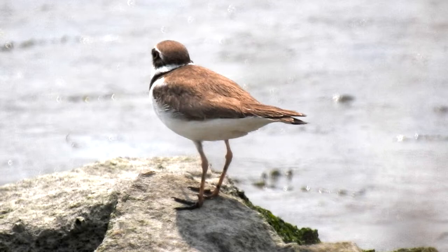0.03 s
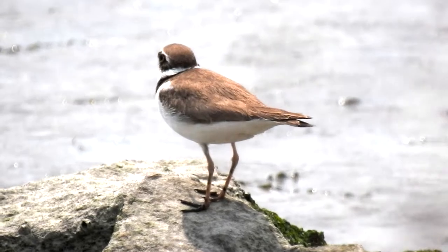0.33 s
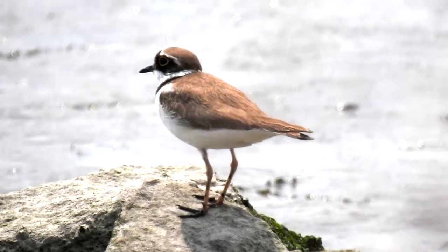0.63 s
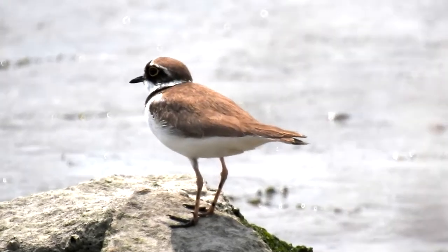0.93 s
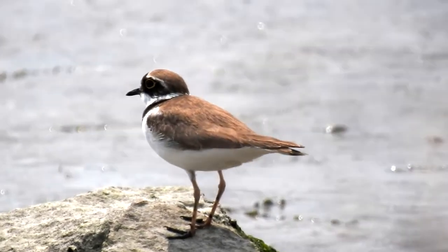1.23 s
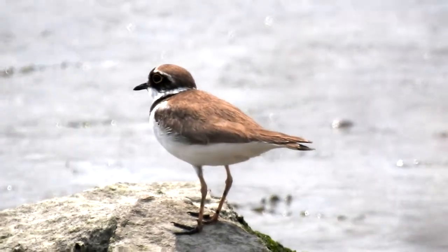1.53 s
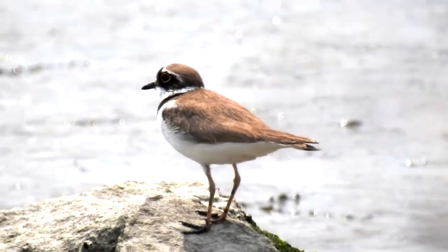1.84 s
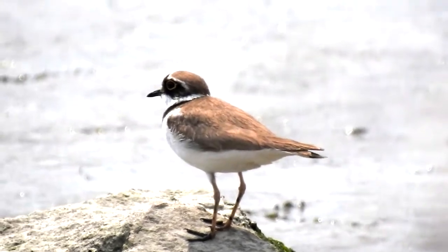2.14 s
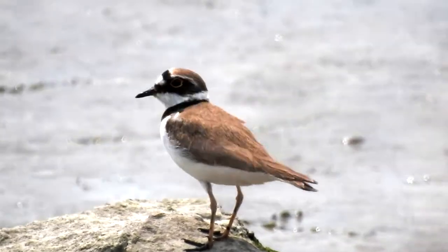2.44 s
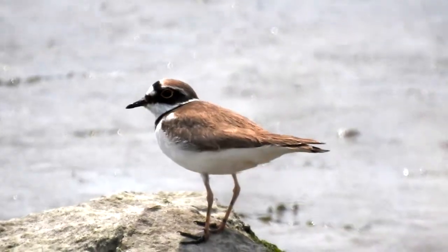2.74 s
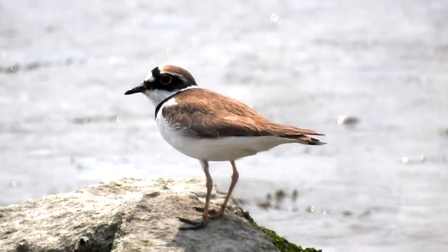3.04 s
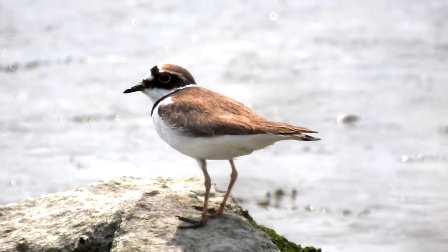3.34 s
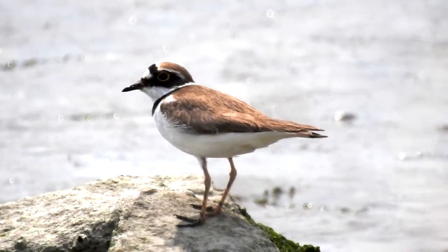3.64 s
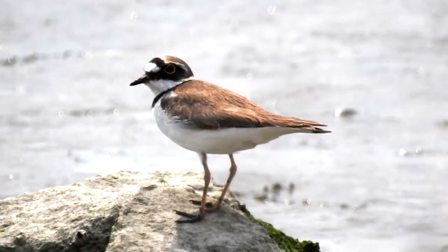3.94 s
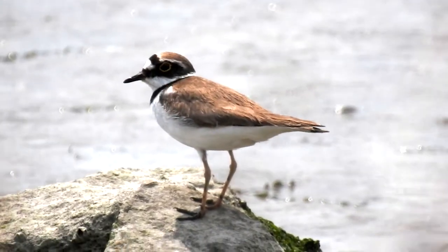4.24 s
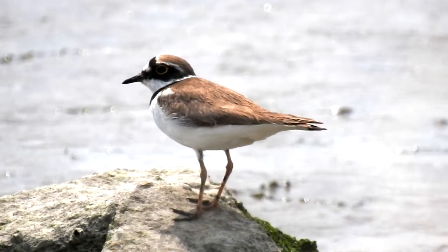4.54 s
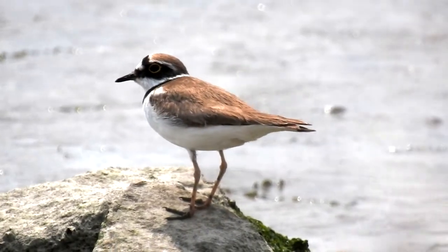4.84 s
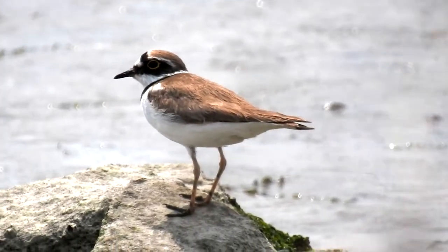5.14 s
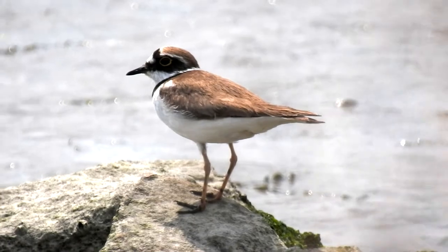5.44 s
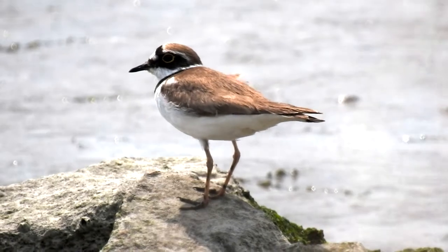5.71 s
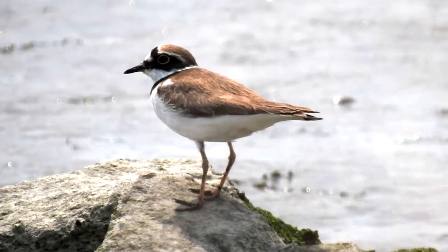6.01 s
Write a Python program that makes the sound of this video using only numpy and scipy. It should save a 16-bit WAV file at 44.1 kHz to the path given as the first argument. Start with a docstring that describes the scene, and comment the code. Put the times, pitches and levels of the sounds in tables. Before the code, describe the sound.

Outdoors on a rocky riverbank, shallow water flows in a steady, bubbling rush that starts abruptly with a sharp pop. It gurgles and laps among the stones, turning a little softer about halfway, just as a small bird whistles a single quick chirp. Underneath are a very faint distant hum, slight puffs of wind and a few soft bumps of a hand on the microphone. A tiny tick comes late.

```python
"""A shallow river rushes past a stony bank: turbulent noise full of small ringing bubbles.
Hollows between the stones resonate, the water surges and gurgles, wavelets lap, spray hisses to the
left, and midway the current eases. The sound opens out of silence with a sharp pop.
Puffs of wind and the soft bumps and brush of a hand touch the microphone; a faint, far hum
comes and goes, a small bird whistles one chirp, and there is one tiny tick."""
import sys
import numpy as np
from scipy import signal
from scipy.fft import rfft, irfft, next_fast_len
from scipy.io import wavfile
from scipy.ndimage import uniform_filter1d, map_coordinates

SR = 44100
rng = np.random.default_rng(int(sys.argv[2]) if len(sys.argv) > 2 else 0)


def persist_wave(psi):
    """Save psi, clipped to +-1, as 16-bit WAV."""
    counts = np.round(np.clip(psi, -1, 1) * 32767).astype(np.int16)
    wavfile.write(sys.argv[1], SR, np.atleast_2d(counts).T)


N = 272097

# Spectra of the rush before and after the current eases, the spray, the river bed, the wind and
# the brushing hand. Each row: frequency in Hz, relative spectral density in dB.
BRISK_SPECTRUM = [(180, -49), (300, -35.5), (373, -25.5), (443, -15), (489, -17), (555, -10), (648, -13.5),
                  (860, -5.5), (1080, -4.5), (1340, -4), (1700, -3.5), (2040, -3), (2240, -5.5), (2420, -6),
                  (2740, -14), (3080, -8.5), (3290, -6), (3780, -13), (4000, -21), (5200, -61.5),
                  (8800, -120)]
EASED_SPECTRUM = [(180, -71.5), (300, -23.5), (489, -14), (560, -10.5), (722, -8.5), (880, -4.5),
                  (1000, -5.5), (1140, -3.5), (1390, -3.5), (1520, -5), (1950, -2.5), (2200, -4),
                  (2460, -6.5), (2720, -11.5), (3100, -7), (3380, -8.5), (3800, -15), (4000, -24),
                  (5200, -63), (8800, -120)]
SPRAY_SPECTRUM = [(2000, -40.5), (3960, -3.5), (4130, 1.5), (4700, 2), (5500, -1.5), (6800, -4.5),
                  (8000, -16), (9100, -25.5), (10000, -37), (13000, -51.5)]
MURMUR_SPECTRUM = [(25, -32.5), (60, -26.5), (110, -5), (170, 3.5), (260, 3), (380, -3.5), (700, -8.5)]
WIND_SPECTRUM = [(40, -29), (110, -5.5), (180, 5), (350, 8), (800, -9), (1600, -23.5)]
BRUSH_SPECTRUM = [(2000, -10), (7000, 0), (13000, -3), (15000, -19)]
# Likeness of left and right in the brisk and eased rush. Each row: frequency in Hz, coherence 0-1.
BRISK_COHERENCE = [(300, 0.96), (700, 0.99), (1000, 0.99), (1500, 0.96), (2700, 0.93), (3300, 0.94),
                   (4000, 1)]
EASED_COHERENCE = [(300, 1), (800, .985), (1200, 0.94), (1600, 0.88), (2700, 0.9), (3300, 0.91),
                   (4000, .83)]
# Cavities between stones. Each row: resonance in Hz, bandwidth in Hz, brisk and eased levels in dB.
HOLLOW_MODES = [(1119, 77, -64.5, -53.5), (1215, 37, -58, -57.5), (1387, 55, -57, -53),
                (1653, 86, -56.5, -56.5), (1930, 270, -60, -57.5)]
# Strength of the spray. Each row: time in seconds, level in dB.
SPRAY_ENVELOPE = [(0.3, -50), (0.46, -52.5), (1.1, -50.5), (1.78, -51), (2.1, -49), (2.7, -52),
                  (3.35, -53.5), (6.1, -55.5)]
# Level difference of the water between channels. Each row: frequency in Hz, left minus right in dB.
WATER_BALANCE = [(300, 0.1), (1000, -0.5), (1600, -.3), (1950, .5), (2900, 0), (3550, 1.3), (3900, 2),
                 (4200, 4.5), (5200, 5.5), (5750, 5.5), (7200, 5.5), (8200, 2), (10000, 0)]
# Phase difference of the water. Each row: frequency in Hz, lag of the left channel in radians.
WATER_PHASE_LAG = [(1400, 0.02), (4800, 0.35), (6300, .8), (7500, 1.6)]
# Brief swells in one band of the water: two broad, bright surges just after the pop, then gurgles.
# Each row: centre in seconds, half-length in seconds, pitch in Hz, bandwidth in Hz, level in dB.
BAND_SWELLS = [(0.205, 0.07, 1870, 450, -40.5), (0.347, 0.054, 1820, 300, -42),
               (0.563, 0.15, 1665, 80, -44), (0.798, 0.099, 1905, 91, -43.5),
               (1.57, 0.091, 1754, 98, -44.5), (1.795, 0.048, 1226, 131, -44),
               (2.58, 0.053, 1300, 199, -46.5), (2.74, .05, 1950, 200, -45.5), (3.32, .04, 1910, 63, -45),
               (3.85, 0.028, 1087, 70.4, -46), (3.963, 0.042, 1934, 54.8, -43.5),
               (4.203, 0.044, 1950, 75, -45), (4.41, 0.038, 1913, 99, -43.5),
               (4.52, 0.04, 1880, 250, -42.5), (4.8, 0.069, 1104, 70, -43), (4.787, 0.032, 1207, 111, -47),
               (5.11, 0.032, 1977, 70, -41.5)]
# Lulls between wavelets. Each row: centre in seconds, half-length in seconds, gain in dB.
LULL_EVENTS = [(0.42, 0.046, -3), (0.672, 0.031, -5.5), (1.093, 0.042, -5.5), (1.668, 0.032, -0.5),
               (3.367, 0.046, -3.5), (3.687, 0.023, -1.5), (4.665, .025, -3.5), (5.033, 0.042, -2),
               (5.23, .03, -1), (5.744, 0.025, -2.5)]
# Puffs of wind. Each row: centre in seconds, level in dB.
WIND_PUFFS = [(.645, -52.5), (1.51, -62), (1.83, -58), (2.575, -55.5), (2.87, -56), (3.15, -59),
              (5.87, -55)]
# Spells of the far hum. Each row: start in seconds, end in seconds, pitch in Hz, gain in dB.
HUM_SPELLS = [(0.699, 1.006, 79, -70), (1.546, 1.6, 79.7, -78), (3.348, 3.9, 89.7, -72),
              (4.197, 5.05, 90.3, -74)]
# Wavelets lapping the stones. Each row: centre in seconds, strength 0-1.
WAVELETS = [(1.23, 0.54), (1.47, 1), (1.79, 0.2), (1.94, 1), (2.1, 0.5), (3.86, 0.4), (4.16, 0.75),
            (4.4, 1), (4.72, .55), (4.84, 0.5), (5.12, 0.55), (5.36, 0.95), (5.5, 0.96), (5.61, 0.74),
            (5.9, 1), (6.03, 1), (6.14, 0.8)]
# Knocks of the hand. Each row: start in seconds, pitch in Hz, envelope peak in dB.
HAND_BUMPS = [(2.546, 180, -51), (2.851, 204, -51), (2.856, 410, -52), (5.756, 175, -50.5),
              (5.862, 210, -56)]

OPEN_S = 0.1166  # the pop ends the silence
EASE_S, EASE_LENGTH_S = 2.8, 0.72  # middle and length of the current's easing


def amp(db):
    """Amplitude ratio of a level in decibels."""
    return 10 ** (np.asarray(db) / 20)


def unit(x):
    """Normalisation to rms 1."""
    return x / np.sqrt(np.mean(x ** 2) + 1e-20)


def clock():
    """Time of each sample in seconds."""
    return np.arange(N) / SR


def along(points, hz):
    """Interpolation of (Hz, value) points on a logarithmic frequency axis."""
    f, v = np.transpose(points)
    return np.interp(np.log(hz + 1), np.log(f + 1), v)


def curve(points):
    """Linear interpolation of (seconds, value) points at every sample."""
    return np.interp(clock(), *np.transpose(points))


def wobble(rate):
    """Smooth random modulation with rate knots a second."""
    return map_coordinates(rng.standard_normal(int(N * rate / SR) + 4), [np.arange(N) * rate / SR])


def swell(s, length):
    """Gaussian envelope about time s; its half-length is one standard deviation."""
    first, last = np.clip([int((s + side * 6 * length) * SR) for side in (-1, 1)], 0, N)
    return np.pad(np.exp(-.5 * ((np.arange(first, last) / SR - s) / length) ** 2), (first, N - last))


def filtered(x, response):
    """Linear filtering: the spectrum of x times a frequency response."""
    m = next_fast_len(N + SR // 2)
    return irfft(rfft(x, m) * response(np.fft.rfftfreq(m, 1 / SR)), m)[..., :N]


def resonance(hz, width_hz):
    """Response of one resonator to random forcing, rms 1."""
    m = next_fast_len(N)
    f = np.arange(m // 8) * SR / m
    real, imag = rng.standard_normal((2, len(f)))
    return unit(irfft((real + 1j * imag) / (1 + ((f - hz) / width_hz * 2) ** 2), m)[:N])


def turbulence(depth_db):
    """Two independent noises, modulated by narrow patches of gain in time and frequency."""
    spectra = signal.stft(rng.standard_normal((2, N)), nperseg=2048)[2]
    patches = uniform_filter1d(rng.standard_normal(spectra.shape[1:]), size=3, axis=0)
    patches = uniform_filter1d(patches, size=6, axis=1)
    gain = amp(depth_db * 2 * np.tanh(unit(patches) / 2))
    return unit(signal.istft(spectra * gain, nperseg=2048)[1][:, :N])


def stereo(pair, spectrum, coherence):
    """Partial coherence: two independent signals are coloured and mixed as mid and side, rms 1."""
    def response(hz):
        angle = np.arccos(np.clip(along(coherence, hz), -1, 1)) / 2
        rolloff = 1 / (1 + (hz / (2 * spectrum[-1][0])) ** 4)
        return rolloff * amp(along(spectrum, hz)) * [np.cos(angle), np.sin(angle)]
    mid, side = filtered(pair, response)
    return unit(np.array([mid + side, mid - side]))


def pop(db, ring_hz, decay_s, thud_db, thud_s):
    """Impulse response of a heavily damped oscillator, with a dull thud under it."""
    t = np.maximum(clock() - OPEN_S, 0)
    crack = amp(db) * np.sin(2 * np.pi * ring_hz * t) * np.exp(-t / decay_s)
    return crack + amp(thud_db) * t / thud_s * np.exp(-t / thud_s)


def opening(excess, settle_s):
    """Exponential relaxation: out of silence the gain overshoots, then settles to 1."""
    t = clock() - OPEN_S
    return np.clip(t * 2000, 0, 1) * (1 + excess * np.exp(-np.abs(t) / settle_s))


def bubbles(centre_hz, spread, cycles, size_db, rise, count):
    """Bubble resonance: each is a damped sine whose pitch rises as it nears the surface."""
    when, size = rng.random((2, count, 1))
    hz = np.clip(centre_hz * np.exp(spread * rng.standard_normal((count, 1))), 500, 8000)
    k = np.arange(int(5 * SR * cycles / centre_hz))
    age = hz * k / SR / cycles  # in decay times, each lasting `cycles` periods
    strength = np.sqrt(hz) * amp(-size_db * np.log(1 - .98 * size))
    phase = 2 * np.pi * cycles * age * (1 + rise * np.minimum(age, 4) / 2)
    ring = strength * np.exp(-age) * np.sin(phase)
    samples = (when * N).astype(int) + k
    return unit(np.bincount(samples.ravel(), ring.ravel(), N)[:N])


def rush(eased, brisk_db=-37, eased_db=-40):
    """Turbulent flow radiates broadband noise and bubble tones, softer and mellower as it eases."""
    swarm = np.array([bubbles(2066, spread=0.456, cycles=8.3, size_db=2.5, rise=0.011, count=5000)
                      for _ in range(2)])
    plinks = np.array([bubbles(1501, spread=0.33, cycles=26, size_db=2.5, rise=0.006, count=200)
                       for _ in range(2)])
    churn = turbulence(depth_db=3.0) + amp(-16.5) * swarm + amp(-21.5 + 3 * eased) * plinks
    bright = stereo(churn, BRISK_SPECTRUM, BRISK_COHERENCE)
    mellow = stereo(churn, EASED_SPECTRUM, EASED_COHERENCE)
    level_db = brisk_db + eased * (eased_db - brisk_db) + 0.4 * wobble(18)
    return amp(level_db) * ((1 - eased) * bright + eased * mellow)


def hollows(eased):
    """Cavity resonance: the flow keeps each hollow between the stones ringing in a narrow band."""
    return sum(amp(brisk_db + eased * (eased_db - brisk_db) + 1.8 * wobble(4.14)) * resonance(hz, width)
               for hz, width, brisk_db, eased_db in HOLLOW_MODES)


def spray():
    """Fine spray sums to a hiss whose channels lose coherence as frequency rises."""
    hiss = stereo(turbulence(depth_db=1.4), SPRAY_SPECTRUM, [(4000, 0.93), (5500, .55), (7000, 0.25)])
    return amp(curve(SPRAY_ENVELOPE)) * hiss


def murmur(eased):
    """Eddies over the river bed radiate low-frequency noise."""
    eddies = stereo(turbulence(depth_db=1.5), MURMUR_SPECTRUM, [(60, .9), (160, 0.78)])
    return amp(-63.0 - 0.5 * eased + 1.5 * wobble(8.5)) * eddies


def river():
    """Superposed water sounds, placed by level and phase: the treble is louder and later on the left."""
    eased = np.clip((clock() - EASE_S) / EASE_LENGTH_S + .5, 0, 1)
    sides = np.array([[.5], [-.5]])  # left, right
    water = lulls(rush(eased) + laps() + hollows(eased))
    for s, length, hz, width_hz, db in BAND_SWELLS:
        water += amp(db) * band_swell(s, length, hz, width_hz)
    water *= amp(0.7 * eased * sides)  # the eased current lies a little to the left
    water = water + spray() + murmur(eased)
    return filtered(water, lambda hz: amp(sides * along(WATER_BALANCE, hz))
                    * np.exp(-1j * sides * along(WATER_PHASE_LAG, hz)))


def band_swell(s, length, hz, width_hz, pure_below_hz=87):
    """Amplitude modulation of one band: a broad one is heard as a surge, a narrow one as a gurgle."""
    envelope = swell(s, length)
    purity = 1 / (1 + (width_hz / pure_below_hz) ** 4)
    note = unit(np.sin(2 * np.pi * np.cumsum(hz + .25 * width_hz * wobble(50)) / SR))
    band = np.sqrt(purity) * note + np.sqrt(1 - purity) * resonance(hz, width_hz)
    return unit(envelope * band) * np.sqrt(np.mean(envelope ** 2))


def lulls(water, below_hz=1150):
    """Low-shelf attenuation: between wavelets the body of the rush thins while its treble stays."""
    body = filtered(water, lambda hz: 1 / (1 + (hz / below_hz) ** 6))
    dip_db = sum(db * swell(s, length) for s, length, db in LULL_EVENTS)
    return water + body * (amp(dip_db) - 1)


def wind():
    """Puffs make the pressure flutter almost independently at each microphone port."""
    strength = sum(amp(db) * swell(s, length=0.016) for s, db in WIND_PUFFS)
    return strength * stereo(rng.standard_normal((2, N)), WIND_SPECTRUM, [(200, .15)])


def hum(fade_db_per_s=64):
    """A far, frequency-modulated drone and a narrow-band rumble fade in and out together."""
    t = clock()
    level_db = np.max([db - fade_db_per_s * np.abs(t - np.clip(t, start, end))
                       for start, end, _, db in HUM_SPELLS], axis=0)
    pitch_hz = curve([((start + end) / 2, hz) for start, end, hz, _ in HUM_SPELLS])
    drone = unit(np.sin(2 * np.pi * np.cumsum(pitch_hz + 2.5 * wobble(5.1)) / SR))
    gain = amp(level_db + 1.5 * wobble(6.9))
    return gain * (amp(-3.5) * drone + amp(-5.5) * resonance(hz=75, width_hz=29))


def laps(db=-45):
    """Forced resonance: each wavelet that laps the stones excites the same hollow."""
    forcing = sum(strength * swell(s, length=0.033) for s, strength in WAVELETS)
    return amp(db) * forcing * resonance(hz=1126, width_hz=170)


def bumps(rise_s=0.0064):
    """Damped vibration: each soft knock of a hand on the microphone swells and dies in a few cycles."""
    out = np.zeros(N)
    for s, hz, db in HAND_BUMPS:
        t = np.maximum(clock() - s, 0)
        out += amp(db) * t / rise_s * np.exp(1 - t / rise_s) * np.sin(2 * np.pi * hz * t)
    return out


def brush(s=2.85, db=-84):
    """Friction of skin on the microphone gives a faint burst of bright noise."""
    friction = stereo(rng.standard_normal((2, N)), BRUSH_SPECTRUM, [(7000, .5)])
    return amp(db) * swell(s, length=.015) * friction


def bird(start_s=3.014, db=-33):
    """A frequency-modulated whistle creeps up, weakens at its top and slurs down to a faint trail."""
    top_hz, top_s, climb_hz_per_s = 3400, 0.036, 3300
    fall_hz, fall_s = 766, 0.026
    attack_s, hold_s, release_s = 0.002, 0.0543, 0.002
    trail_db, trail_db_per_s = -10, 300
    t = clock() - start_s
    before, after = np.maximum(top_s - t, 0), np.maximum(t - top_s, 0)
    hz = top_hz - climb_hz_per_s * before - fall_hz * (1 - np.exp(-(after / fall_s) ** 2))
    released = np.maximum(t - hold_s, 0)
    ending = np.maximum(1 - released / release_s, amp(trail_db - trail_db_per_s * released))
    envelope = np.clip(t / attack_s, 0, 1) * ending
    catch = 1 - swell(start_s + 0.0086, length=0.0018)  # the voice breaks briefly
    sag_db = -4.5 * swell(start_s + top_s, length=0.0076)
    gain = amp(db + sag_db + wobble(120))
    whistle = unit(np.sin(2 * np.pi * np.cumsum(hz + 15 * wobble(400)) / SR))
    return envelope * catch * gain * whistle


def tick(s=5.4232, click_db=-39.5, thump_db=-66):
    """A one-sample impulse gives a broadband click; a wider pulse adds a low thump."""
    click = np.arange(N) == round(s * SR)
    return amp(click_db) * click + amp(thump_db) * swell(s, length=0.0019)


def scene():
    """Superposition of all sources on the bank, opened by the pop."""
    bank = river() + wind() + hum() + bird() + bumps() + brush() + tick()
    onset = pop(db=-2.0, ring_hz=1610, decay_s=0.0005, thud_db=-47, thud_s=0.0021)
    return onset + bank * opening(excess=5.7, settle_s=0.022)


def record(dry):
    """Band limiting: a steep low-pass filter removes what lies above 16 kHz."""
    return filtered(dry, lambda hz: 1 / (1 + (hz / 16000) ** 80))


dry = scene()
out = record(dry)
persist_wave(out)
```